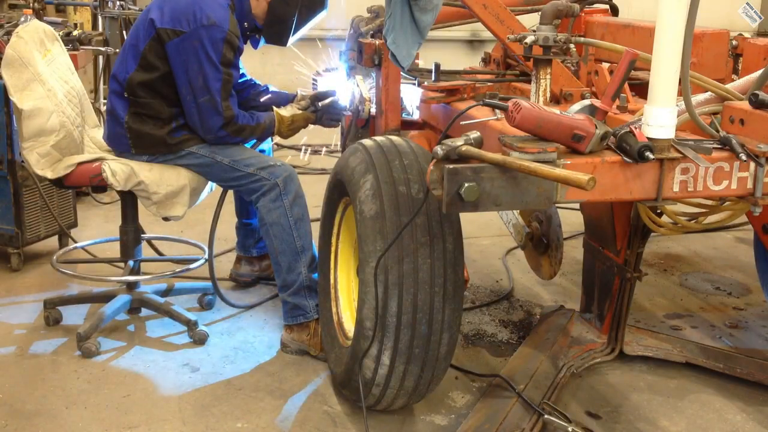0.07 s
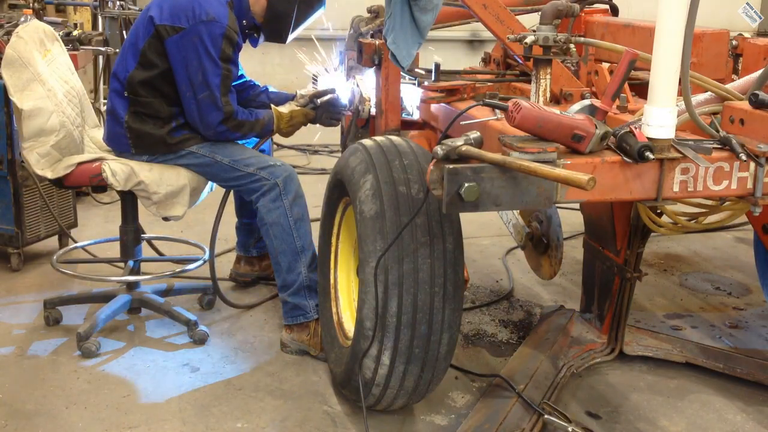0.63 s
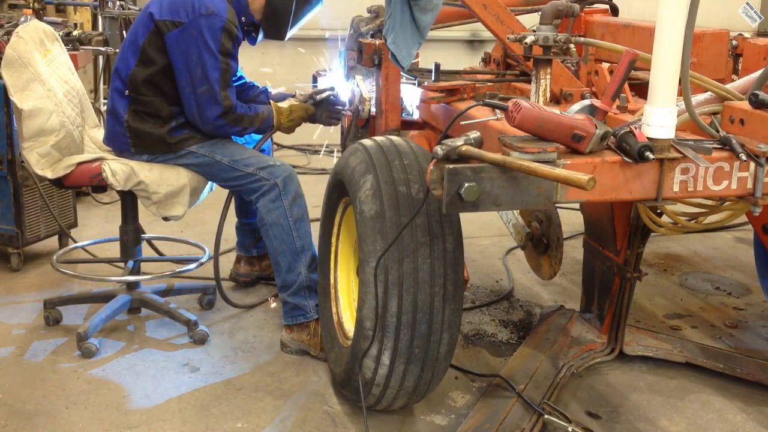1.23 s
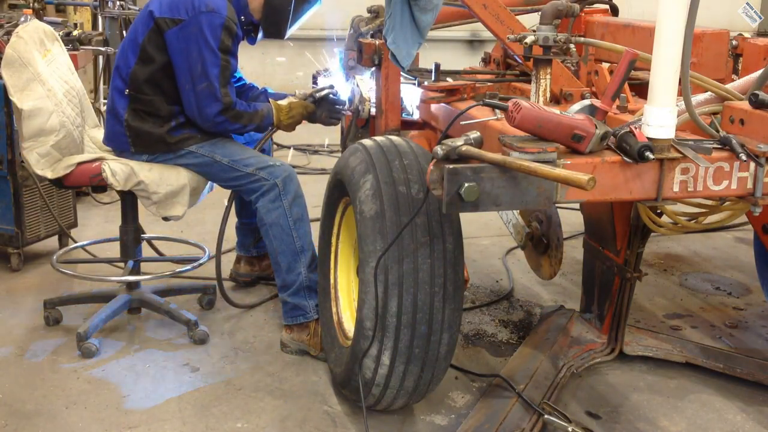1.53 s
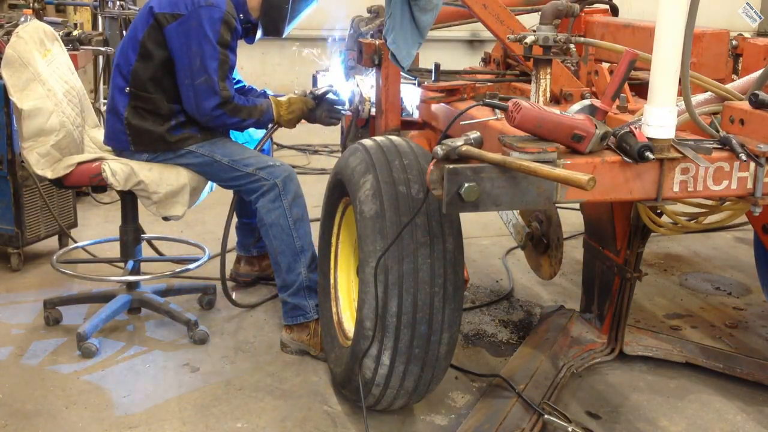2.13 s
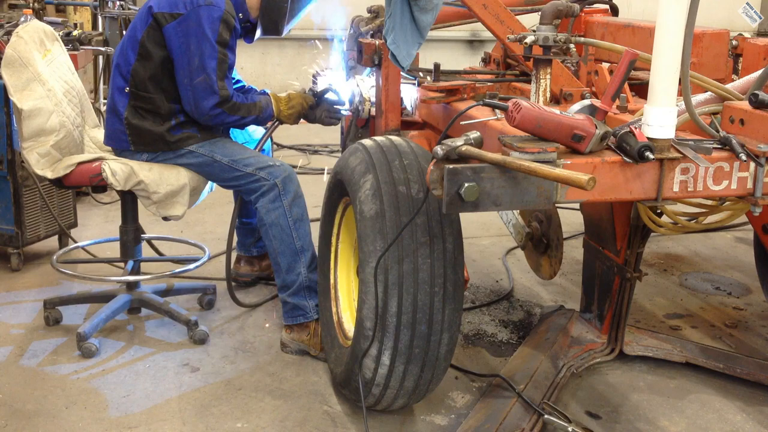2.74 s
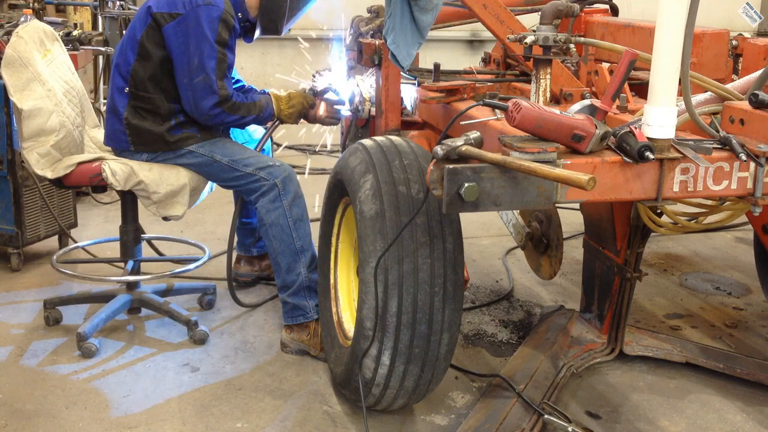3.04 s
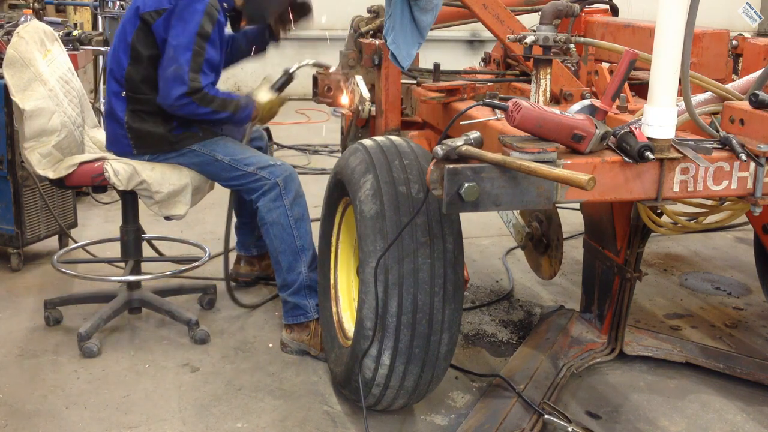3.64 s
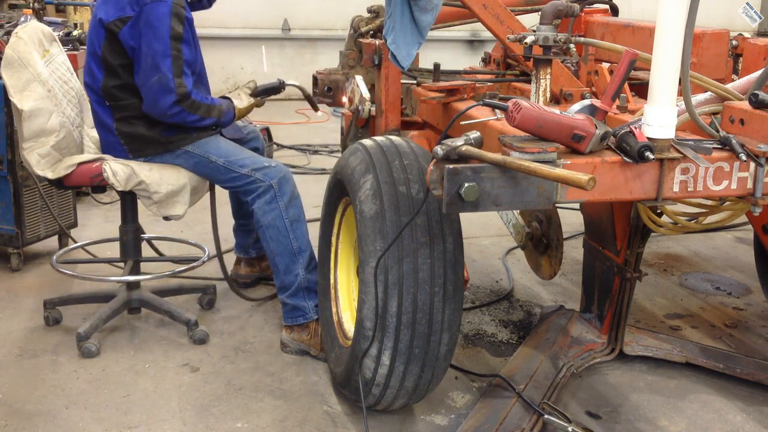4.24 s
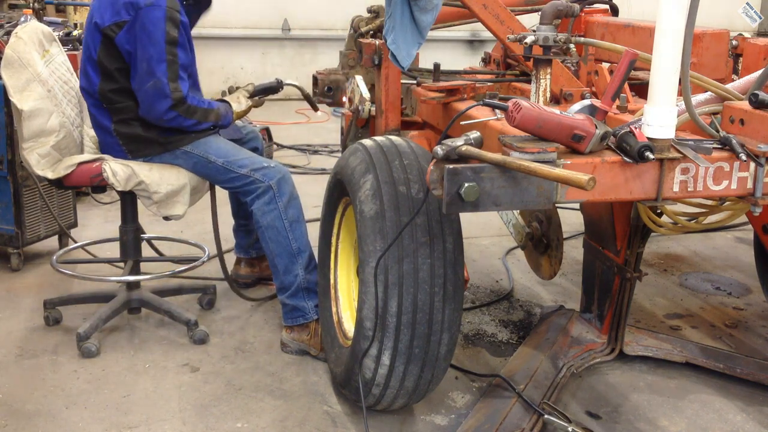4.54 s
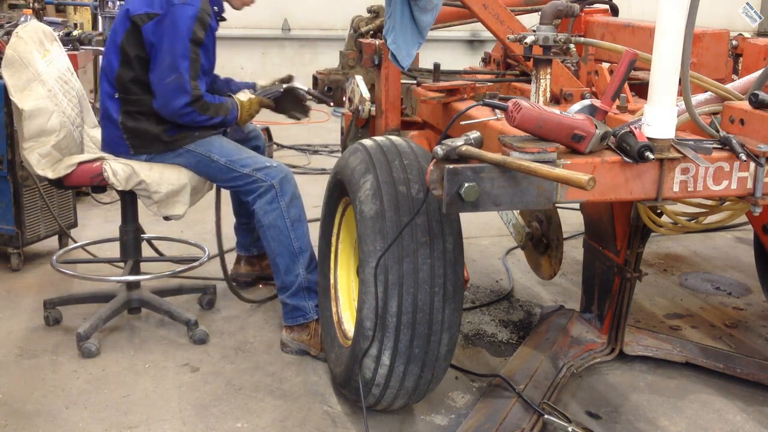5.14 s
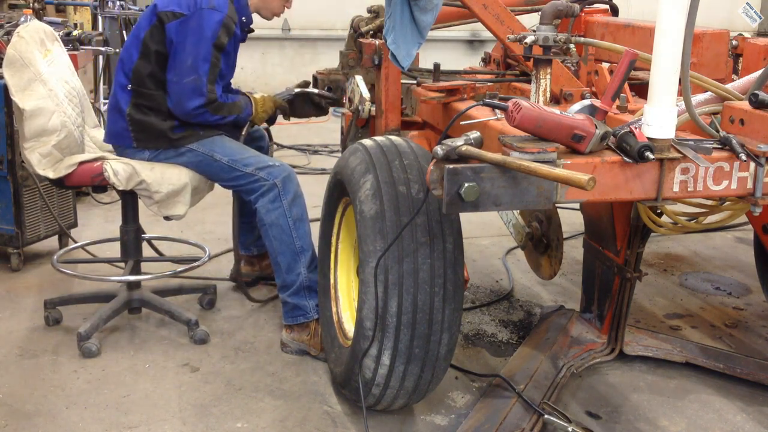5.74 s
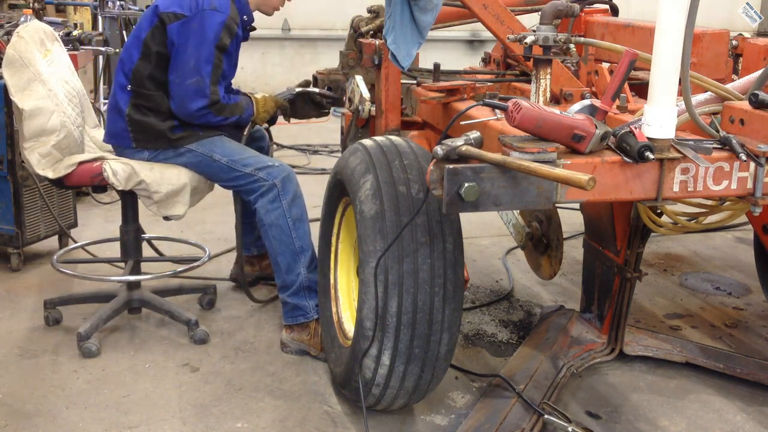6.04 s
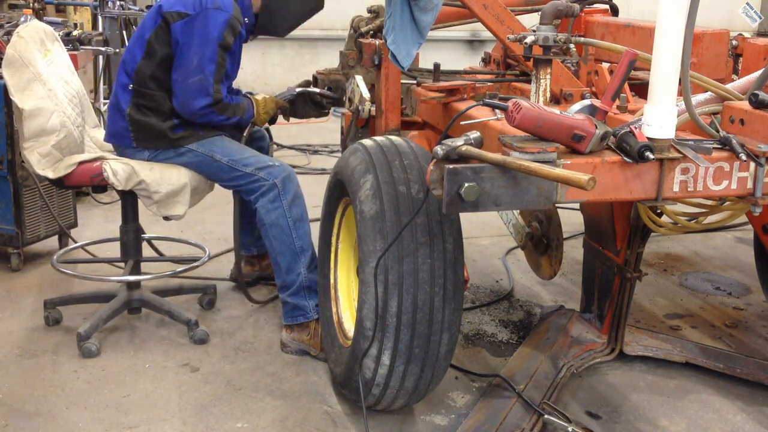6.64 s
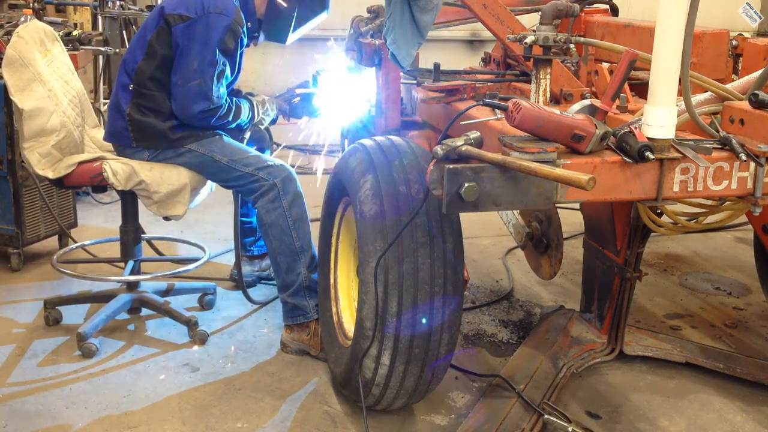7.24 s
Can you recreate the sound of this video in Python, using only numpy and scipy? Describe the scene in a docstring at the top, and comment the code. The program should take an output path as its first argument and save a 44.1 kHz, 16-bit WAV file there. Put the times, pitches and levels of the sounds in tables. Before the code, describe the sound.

Sizzling, snapping arc welding breaks off, leaving a steady hum and soft tool handling, before the crackle starts again.

```python
"""A wire-feed welder runs two beads on a steel frame in a reverberant workshop.
The wire shorts and the arc relights about a hundred times a second, each time with a snap that rings
the gas nozzle, over sizzle and roar; big drops burst with a pop. In the pause the transformer hums
while the welder shifts on his stool and handles the torch. Then the wire fizzes and strikes again."""
import sys
import numpy as np
from scipy import signal
from scipy.fft import rfft, irfft, next_fast_len
from scipy.io import wavfile
from scipy.ndimage import uniform_filter1d, map_coordinates

SR = 44100
rng = np.random.default_rng(int(sys.argv[2]) if len(sys.argv) > 2 else 0)


def waveform_to_disk(signal):
    """Save audio, clipped to [-1, 1], as 16-bit WAV at the path in sys.argv[1]."""
    frames = np.transpose(np.atleast_2d(signal))
    scaled = np.clip(frames, -1, 1) * 32767
    samples = np.round(scaled).astype(np.int16)
    wavfile.write(sys.argv[1], SR, samples)


N = 325458
MAINS_HZ, RIPPLE_HZ = 60, 360
TOUCH_S = 6.633  # wire meets steel for the second bead

# arc level, one list per bead: time_s, crackle_db, roar_db
BEADS = [
    [(0.0, -15.5, -30.5), (0.05, -22, -34.5), (0.14, -24.5, -34), (0.24, -19, -32), (0.33, -27, -33),
     (0.37, -26, -42), (0.39, -29, -45), (0.48, -22.5, -40), (0.55, -29, -38), (0.59, -20.5, -36),
     (0.63, -24, -37), (0.71, -24.5, -35), (0.84, -25, -38.5), (0.97, -23, -38), (1.09, -22, -35),
     (1.28, -21, -36), (1.41, -27, -41.5), (1.6, -25.5, -42), (1.66, -22.5, -36.5), (1.84, -22.5, -38.5),
     (2.0, -24, -35.5), (2.17, -21, -37.5), (2.42, -22, -40.5), (2.47, -22, -42), (2.58, -22.5, -36.5),
     (2.63, -24, -40.5), (2.72, -18.5, -35.5), (2.79, -20, -36), (3.01, -23.5, -34), (3.04, -19.5, -37),
     (3.24, -22.5, -35), (3.3, -16.5, -29)],
    [(6.85, -23, -45), (6.894, -23, -36.5), (7.1, -22.5, -33.5), (7.278, -26, -36.5), (7.38, -20, -29.5)],
]
# big drops bursting: start_s, level_db, sparks_relative_db
DROPS = [(0.3011, -2.5, -3.5), (0.31, -5, -5), (0.3461, -4.5, -2), (0.3599, -1, 2.5), (0.4364, -6, -9),
         (0.6366, -1.5, 0), (0.6447, -6, 1), (1.2521, -5, -2), (1.4303, -1.5, 0), (1.4394, -7.5, 1),
         (1.4983, -7, 0), (1.5425, -7, -1.5), (1.6459, -2, 1), (1.6579, -4, -1.5), (1.6675, -6, -3.5),
         (2.0557, -2.5, -1.5), (2.0656, -7, -3), (2.4008, -2, -6), (2.4213, -3, -4.5), (2.431, -4.5, -3.5),
         (2.444, -6, -4.5), (2.752, -8.5, -3), (2.8311, -7.5, -2), (3.0283, -2.5, 0), (3.2576, -7, -2.5),
         (3.2831, 1, 1), (3.292, -10.5, -6)]
# wire striking cold steel: start_s, level_db, sparks_relative_db
STRIKES = [(6.64, 0.5, -0.5), (6.773, -4, 1.5), (6.8339, -2, -1), (6.8527, -6.5, -7), (6.877, -13, -10),
           (6.962, -5.5, 2)]
# spectrum of bursting metal: freq_hz, gain_db
POP_SPECTRUM = [(70, -54.5), (130, -8.5), (500, -14), (1800, -13.5), (3000, -3), (5000, -3.5), (7200, 1.5),
                (9500, -8), (14000, -3), (18000, -29.5)]
# spectrum of the burning arc: freq_hz, gain_db
ROAR_SPECTRUM = [(40, -35), (80, -30), (105, -4), (160, -7), (240, -4.5), (400, -7), (500, -5.5), (900, -4),
                 (1080, -7.5), (1500, -10), (2000, -10.5), (3500, -9.5), (8000, -56)]


def amp(db):
    """Decibels to gain."""
    return 10 ** (np.asarray(db) / 20)


def unit(x):
    """Scale to rms 1."""
    return x / np.sqrt(np.mean(x ** 2) + 1e-20)


def along(points, hz):
    """Interpolate (freq_hz, value) points on a log axis."""
    freqs_hz, values = np.transpose(points)
    return np.interp(np.log(hz + 1), np.log(freqs_hz + 1), values)


def clock():
    """Sample times in s."""
    return np.arange(N) / SR


def swell(rows, column=1):
    """Gain per sample from a dB column; silent outside the rows."""
    rows = np.asarray(rows)
    return amp(np.interp(clock(), rows[:, 0], rows[:, column], left=-200, right=-200))


def envelope(start_s, rise_s, fall_s):
    """Linear rise, then exponential fall with time constant fall_s."""
    age_s = clock() - start_s
    return np.clip(age_s / rise_s, 0, 1) * np.exp(-np.maximum(age_s - rise_s, 0) / fall_s)


def strokes(rows, rise_s, fall_s):
    """Summed envelopes, one per (peak_s, level_db) row."""
    return sum(amp(db) * envelope(peak_s - rise_s, rise_s, fall_s) for peak_s, db in rows)


def wobble(rate_hz):
    """Smooth random curve, rate_hz knots a second."""
    return map_coordinates(rng.standard_normal(int(N * rate_hz / SR) + 4), [clock() * rate_hz])


def coloured(x, spectrum, size=8192):
    """Minimum-phase filter of unit energy."""
    cepstrum = irfft(np.log(amp(along(spectrum, np.fft.rfftfreq(size, 1 / SR)))))
    cepstrum[1:size // 2] *= 2
    cepstrum[size // 2 + 1:] = 0
    response = irfft(np.exp(rfft(cepstrum)))
    return signal.fftconvolve(x, response / np.linalg.norm(response))[:N]


def noise(spectrum):
    """Coloured noise, rms 1."""
    return unit(coloured(rng.standard_normal(N), spectrum))


def bursts(times_s, gains, t60_s, hold_s=0, size=4096):
    """A noise puff at each time; holds, then decays."""
    age_s = np.maximum(np.arange(size) / SR - hold_s, 0)
    puffs = rng.standard_normal((len(times_s), size)) * amp(-60 * age_s / np.reshape(t60_s, (-1, 1)))
    puffs *= (gains / np.linalg.norm(puffs, axis=1))[:, None]
    where = np.round(np.asarray(times_s) * SR).astype(int)[:, None] + np.arange(size)
    return np.bincount(np.maximum(where, 0).ravel(), puffs.ravel(), N)[:N]


def spikes(times_s, gains):
    """One pressure pulse at each time."""
    return np.bincount(np.maximum(np.round(times_s * SR).astype(int), 0), gains, N)[:N]


def ring(modes, attack_s=0.0005):
    """Decaying modes of a struck body; softer contact, slower attack."""
    t = np.arange(SR // 2) / SR
    tones = sum(amp(db - 60 * t / t60_s) * np.sin(2 * np.pi * hz * t) for hz, db, t60_s in modes)
    return (1 - np.exp(-t / attack_s)) * tones


def shop(x, near_db, near_t60_s=0.21, onset_s=0.00068):
    """Quick scatter from frame and floor, then the hall's long tail."""
    # hall reverberation: freq_hz, t60_s
    decay = [(100, 1.15), (500, .8), (2000, .74), (4500, .6), (7000, .52), (10000, .46), (15000, .35)]
    hz, t, cells = signal.stft(rng.standard_normal(SR), SR, nperseg=256)
    fade = np.hypot(amp(-60 * t / along(decay, hz)[:, None]), amp(near_db - 60 * t / near_t60_s))
    tail = signal.istft(cells * fade, SR, nperseg=256)[1]
    tail *= 1 - np.exp(-(np.arange(len(tail)) / SR / onset_s) ** 2)
    return signal.fftconvolve(x, tail / np.linalg.norm(tail))[:N]


def shop_air(level_db=-64):
    """Steady low room noise."""
    # air spectrum: freq_hz, gain_db
    spectrum = [(30, -36.5), (65, -16.5), (110, 3.5), (200, -1), (400, 0), (700, -4.5), (1400, -8.5),
                (2800, -14), (5600, -15), (7500, -16.5), (10000, -26), (14000, -17)]
    return amp(level_db) * noise(spectrum)


def transformer(load_db=-9, recovery_s=0.2, sag_s=0.14, creep_db_per_s=0.25):
    """Mains harmonics led by the three-phase ripple; the hum sags under load and creeps back."""
    # hum lines: mains_multiple, level_db
    harmonics = [(2, -70), (3, -72.5), (4, -69.5), (5, -69.5), (6, -49.5), (7, -72), (8, -68.5), (9, -74.5),
                 (10, -68.5), (11, -84.5), (12, -71.5), (20, -79)]
    t = clock()
    phase = 2 * np.pi * MAINS_HZ * t
    hum = sum(amp(db) * np.sin(k * phase + rng.uniform(0, 2 * np.pi)) for k, db in harmonics)
    arc_out_s = BEADS[0][-1][0]
    load = np.exp(-np.maximum(t - arc_out_s, 0) / recovery_s) + np.clip((t - TOUCH_S) / sag_s, 0, 1)
    creep_db = creep_db_per_s * (np.clip(t, arc_out_s, TOUCH_S) - (arc_out_s + TOUCH_S) / 2)
    waver_db = 0.15 * wobble(2)
    return np.sqrt(2) * hum * amp(load_db * load + creep_db + waver_db)


def gear_knocks():
    """Torch, cable and helmet knock: a dull clack plus a bright tick."""
    # contacts: start_s, clack_db, tick_db, clack_t60_s
    knocks = [(3.789, -38.5, -57, 0.096), (3.945, -45, -53, 0.15), (4.128, -45, -43.5, .06),
              (4.141, -47, -54, .06), (4.766, -49, -46, .1), (4.773, -50.5, -47, .06),
              (5.009, -41, -54, .05), (5.066, -57, -49, .03), (5.367, -46, -55, 0.083),
              (5.767, -46.5, -74, .035), (5.782, -49.5, -75, .12), (5.865, -48.5, -52, .05),
              (6.168, -63.5, -58, .03), (6.29, -39.5, -51.5, 0.2)]
    # contact spectra: freq_hz, gain_db
    clack_spectrum = [(300, -25), (800, -4), (1900, -4), (3000, -10.5), (5000, -16), (12000, -42)]
    tick_spectrum = [(600, -14), (3000, -5), (7000, 3), (10000, -5.5), (15000, -10)]
    start_s, clack_db, tick_db, clack_t60_s = np.transpose(knocks)
    clacks = coloured(bursts(start_s, amp(clack_db + 10), clack_t60_s), clack_spectrum)
    ticks = coloured(bursts(start_s, amp(tick_db + 12), t60_s=0.013), tick_spectrum)
    return clacks + ticks


def torch_clinks():
    """Metal torch parts touch and ring in two modes."""
    # contacts: start_s, level_db, main_hz, second_hz, t60_s
    clinks = [(3.791, -58, 1690, 2250, .15), (4.079, -62, 1840, 1950, .2), (4.141, -65, 1870, 2010, .2),
              (5.009, -59, 2650, 1430, 0.23), (5.366, -52.5, 2240, 2320, .06),
              (5.767, -55, 1900, 2470, 0.05)]
    track = np.zeros(N)
    for start_s, db, main_hz, second_hz, t60_s in clinks:
        clink = ring([(main_hz, db, t60_s), (second_hz, db - 4, t60_s)])
        track[round(start_s * SR):][:len(clink)] += clink
    return track


def stool_bumps():
    """The stool bumps as the welder leans back."""
    # soft impacts: start_s, level_db
    bumps = [(3.792, -36), (3.815, -52), (3.856, -40), (4.235, -50)]
    # stool modes: freq_hz, level_db, t60_s
    modes = [(428, 2, 0.25), (463, -3, 0.38), (510, 1, 0.14), (676, -8, .15)]
    start_s, db = np.transpose(bumps)
    return signal.fftconvolve(spikes(start_s, amp(db - 8)), ring(modes, attack_s=0.0032))[:N]


def cloth_friction():
    """Sleeves and gloves rub, a glove wipes the thinly singing torch tip, a sleeve swishes."""
    # hand and arm strokes: peak_s, level_db
    rubs = [(3.86, -66.5), (4.15, -70), (4.82, -71), (5.0, -74), (5.37, -65), (6.36, -71)]
    wipes = [(5.18, -66.5), (5.28, -70)]
    swishes = [(4.34, -76), (4.7, -75), (4.81, -73.5), (4.95, -78)]
    # friction spectra: freq_hz, gain_db
    cloth_spectrum = [(300, -14), (900, 2), (1400, 1.5), (2000, -4.5), (4000, -9.5), (7000, -9),
                      (10000, -24), (15000, -21)]
    tip_spectrum = [(1000, -21), (2800, -18), (3100, -14), (3220, -4), (3350, -12), (3700, -19),
                    (4340, -18), (4800, -23), (7000, -30), (10000, -35)]
    sleeve_spectrum = [(1000, -20), (4000, -20), (5300, -12), (5950, 1), (6760, 3), (7600, -4), (8900, -4),
                       (9700, -27), (14000, -18)]
    flutter = amp(1.3 * wobble(30))
    rub = amp(-1) * strokes(rubs, rise_s=0.26, fall_s=0.14) * noise(cloth_spectrum)
    wipe = strokes(wipes, rise_s=0.05, fall_s=0.12) * noise(tip_spectrum)
    swish = strokes(swishes, rise_s=0.072, fall_s=0.086) * noise(sleeve_spectrum)
    return flutter * (rub + wipe) + swish


def handling():
    """The welder moves in the pause; knocks and cloth carry into the hall."""
    direct = gear_knocks() + cloth_friction()
    hall = amp(0.5) * shop(direct, near_db=1, near_t60_s=0.15)
    return direct + hall + stool_bumps() + torch_clinks()


def framed(spectrum):
    """A spectrum lifted by the resonances around the steel frame."""
    # resonances: centre_hz, width_hz, lift_db
    modes = [(462.5, 45, 8), (580, 44, 8), (680, 35, 3.5), (798, 45, 6.5), (990, 45, 7.5), (1105, 25, 4.5),
             (1206, 70, 9.5), (1414, 35, 6), (1634, 40, 3.5), (1821, 55, 9), (2232, 60, 6.5), (2357, 45, 7),
             (2520, 67, 6), (2894, 110, 5), (3070, 50, 5), (3284, 60, 6), (4040, 90, 1.5), (4320, 90, 4.5),
             (4675, 80, 6), (4850, 60, 1), (5180, 50, 2.5), (5750, 140, 6), (5925, 60, 3.5),
             (6270, 40, 2.5), (6300, 38, 2), (6482, 50, 1.5)]
    hz = np.geomspace(20, SR / 2, 2000)
    lift_db = sum(db / (1 + (2 * (hz - centre_hz) / width_hz) ** 2) for centre_hz, width_hz, db in modes)
    return np.column_stack([hz, along(spectrum, hz) + lift_db])


def nozzle(x, wander=0.025):
    """The gas nozzle rings for about 1 ms; its pitch follows the torch and varies per snap."""
    # nozzle response: freq_hz, gain_db
    spectrum = [(60, -70), (130, -30), (600, -18), (1900, -25), (3100, -19), (5400, -19), (6100, -13),
                (6600, -9), (7050, 0), (7650, 0), (8400, -11), (9100, -25), (11500, -23), (14000, -16),
                (17000, -28)]
    # ring sinking along each seam: time_s, pitch_ratio
    glide = [(0, 1.02), (0.6, 1.017), (1.5, 1), (2.4, 0.97), (3.1, 0.953), (6.8, 0.99), (7.38, 0.89)]
    pitch_ratio = np.interp(clock(), *np.transpose(glide)) + wander * wobble(40)
    tunings = np.linspace(0.92, 1.08, 5)
    crossfades = [np.interp(pitch_ratio, tunings, row) for row in np.eye(len(tunings))]
    return sum(coloured(x * share, np.multiply(spectrum, [tuning, 1]))
               for share, tuning in zip(crossfades, tunings))


def pops(events, crack_db, tear_db, blast_db, spray_db, spray_t60_s, hall_db, crack_delay_s=0.0007):
    """Molten metal bursts: ragged crack, blast and spark shower, echoed by the hall."""
    start_s, db, sparks_db = np.transpose(events)
    burst_s = start_s + crack_delay_s
    tear = bursts(burst_s, amp(db + crack_db + tear_db), t60_s=0.0036)
    crack = nozzle(spikes(burst_s, amp(db + crack_db)) + tear)
    blast = coloured(spikes(burst_s, amp(db + blast_db)), POP_SPECTRUM)
    sparks = bursts(burst_s, amp(db + sparks_db + spray_db), spray_t60_s, hold_s=0.017)
    spray = coloured(sparks, POP_SPECTRUM)
    hall = shop(amp(hall_db) * blast + amp(-7) * crack + amp(-5.5) * spray, near_db=3.5, near_t60_s=0.17)
    return crack + blast + spray + hall


def ignition(rise_s=0.0032, flare_t60_s=0.098, hold_s=0.42):
    """The wire touches, fizzes and strikes with a gasp of flame until the arc holds."""
    # flame spectrum: freq_hz, gain_db
    gasp_spectrum = [(60, -35), (130, -2), (350, -14), (560, 1), (800, 3.5), (1200, -8.5), (2000, -8),
                     (3500, -1), (8000, -41)]
    flare = amp(-26.5) * envelope(TOUCH_S, rise_s, flare_t60_s / np.log(1000))
    touching = (clock() > TOUCH_S) & (clock() < TOUCH_S + hold_s)
    fizz = (flare + amp(-50) * touching) * noise(POP_SPECTRUM)
    gasp = amp(-32) * envelope(TOUCH_S, rise_s, fall_s=0.1) * noise(framed(gasp_spectrum))
    strikes = pops(STRIKES, crack_db=1.5, tear_db=3, blast_db=3.5,
                   spray_db=4, spray_t60_s=0.016, hall_db=4.5)
    return fizz + shop(fizz, near_db=10, near_t60_s=0.1) + gasp + strikes


def spatter():
    """Drops burst during a bead: mostly crack, little spray."""
    return pops(DROPS, crack_db=6.5, tear_db=-4, blast_db=-9.5,
                spray_db=0, spray_t60_s=0.013, hall_db=14.5)


def linger(gain, t60_s):
    """Level a source builds up and leaves behind in the hall."""
    retained = amp(-60 / (t60_s * SR)) ** 2
    return np.sqrt(signal.lfilter([1 - retained], [1, -retained], gain ** 2))


def hall_boom(flame, t60_s=0.75, deep_t60_s=1.6, deep_hz=240):
    """The roar lingers as a smooth boom; the deep part lasts longest."""
    field = noise(framed(ROAR_SPECTRUM))
    deep = signal.sosfiltfilt(signal.butter(2, deep_hz, fs=SR, output="sos"), field)
    return linger(flame, t60_s) * (field - deep) + linger(flame, deep_t60_s) * deep


def short_circuits(rate_hz=108, ripple_lock=0.3, count=1100):
    """Snaps of the relighting arc, rms 1; a longer short bursts harder."""
    gaps_s = np.exp(0.15 * rng.standard_normal(count)) / rate_hz
    times_s = np.cumsum(gaps_s)
    # the wire tends to part on a crest of the rectifier ripple
    times_s += ripple_lock * (np.round(times_s * RIPPLE_HZ) / RIPPLE_HZ - times_s)
    sizes = gaps_s * amp(2.2 * np.clip(rng.standard_normal(count), -2.5, 0.8))
    # steady wire feed evens out the energy over a few drops
    sizes /= np.sqrt(uniform_filter1d(sizes ** 2, size=5))
    # before a pop the wire sticks in the pool: no snaps
    lead_s = np.vstack([DROPS, STRIKES])[:, 0] - times_s[:, None]
    sizes *= ~np.any((lead_s > -0.004) & (lead_s < 0.014), axis=1)
    return unit(spikes(times_s, sizes) + bursts(times_s, sizes * amp(-10), t60_s=0.0014, size=256))


def arc(surge_db=1.5, sizzle_db=-13, roar_db=-3, boom_db=-2, throb=0.23):
    """Snaps over the sizzle and roar of the burning arc, which throbs with the mains."""
    # sound passing the welder's hand: time_s, nozzle_ring_db, bare_click_db
    aim = [(0, -8, -37), (1.5, -6.5, -31), (2.4, -6.5, -27), (3.3, -15.5, -16), (6.8, -17, -18),
           (7.38, -25, -8)]
    # bare crackle spectrum: freq_hz, gain_db
    crackle_spectrum = [(800, -33), (1500, -10), (2050, -14.5), (2700, -9.5), (2950, -4.5), (3600, -6),
                        (4500, -3.5), (5050, -5), (6200, -3), (7300, 0.5), (8100, 1.5), (8700, -5),
                        (9200, -9.5), (9700, -9.5), (10200, -10), (13800, -2), (17000, -8.5)]
    colour = framed(crackle_spectrum)
    # the crackle flares after each big drop
    surge = np.max([envelope(start_s, rise_s=0.0037, fall_s=0.046) for start_s, _, _ in DROPS], axis=0)
    strength = sum(swell(bead) for bead in BEADS) * amp(surge_db * surge)
    flame = sum(swell(bead, column=2) for bead in BEADS)
    snaps = strength * short_circuits()
    phase = 2 * np.pi * MAINS_HZ * clock()
    current = unit(1 + throb * (np.cos(phase) + 0.85 * np.cos(2 * phase)))
    grit = rng.standard_normal(N) * amp(6.8 * wobble(1500))
    sizzle = amp(sizzle_db) * strength * unit(current * grit)
    roar = flame * current * noise(framed(ROAR_SPECTRUM))
    boom = hall_boom(flame)
    ringing = swell(aim) * nozzle(snaps)
    direct = amp(0.9) * ringing + coloured(sizzle + swell(aim, column=2) * snaps, colour)
    hall = shop(amp(-3.5) * coloured(snaps + sizzle, colour) + amp(-11) * ringing, near_db=-2)
    return direct + hall + amp(roar_db) * roar + amp(boom_db) * boom


def scene():
    """Arc, pops and handling over hum and shop air; mono."""
    return (arc() + spatter() + ignition() + handling() + transformer() + shop_air())[None]


def record(dry, low_cut_hz=136, top_hz=15650, taper_hz=300):
    """Clip the highest peaks, cut the deep bass, limit the band."""
    highpass = signal.butter(2, low_cut_hz, btype="high", fs=SR, output="sos")
    thin = signal.sosfilt(highpass, np.clip(dry, -1, 1))
    size = next_fast_len(N + SR // 2)
    passband = np.clip((top_hz - np.fft.rfftfreq(size, 1 / SR)) / taper_hz, 0, 1)
    return irfft(rfft(thin, size) * passband, size)[..., :N]


dry = scene()
out = record(dry)
waveform_to_disk(out)
```